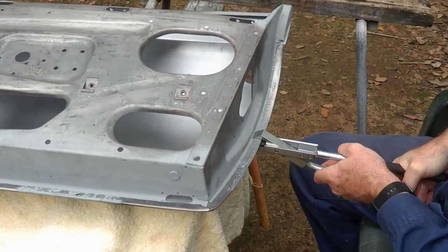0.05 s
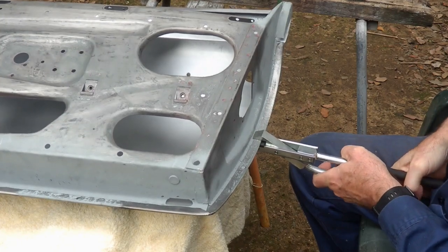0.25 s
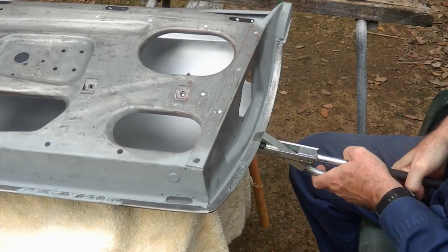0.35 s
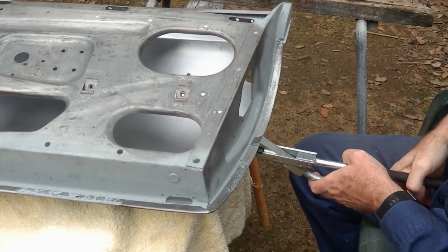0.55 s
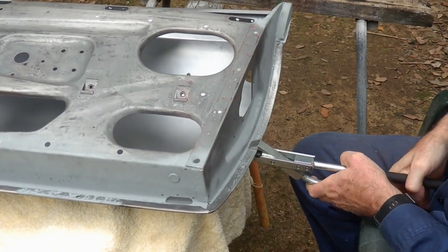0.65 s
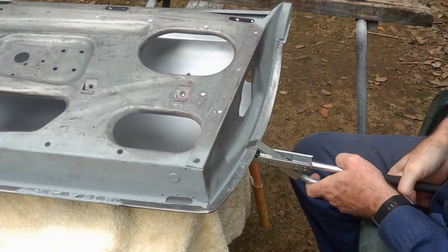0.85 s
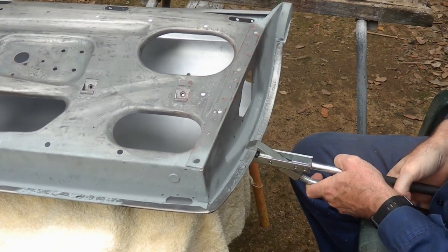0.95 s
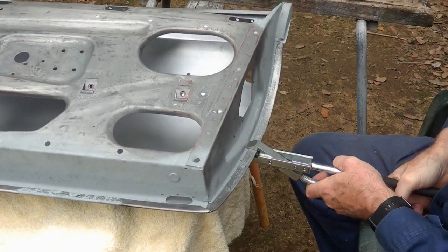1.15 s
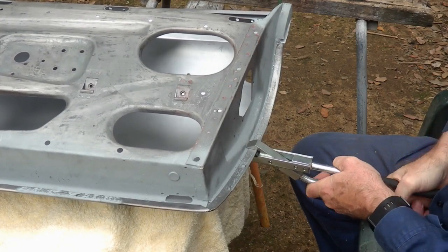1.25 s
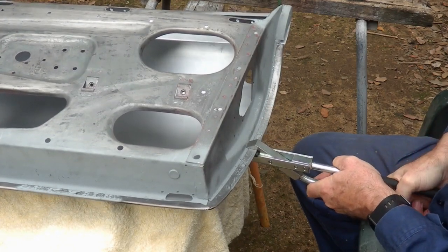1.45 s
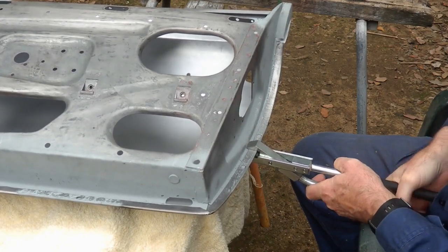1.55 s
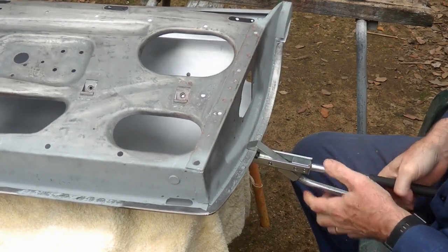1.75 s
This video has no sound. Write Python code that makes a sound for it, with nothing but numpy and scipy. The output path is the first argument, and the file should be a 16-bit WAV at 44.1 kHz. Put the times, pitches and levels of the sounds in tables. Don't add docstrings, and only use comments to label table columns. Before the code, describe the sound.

After a brief quiet, thin metal groans, pops and crackles under a hand tool, strongest around the middle, then rings away to a few small clicks; low rumble and a faint bird, recorded a metre or two away.

```python
import sys
import numpy as np
from scipy import signal
from scipy.fft import rfft, irfft
from scipy.io import wavfile
from scipy.ndimage import uniform_filter1d

SR = 44100
rng = np.random.default_rng(int(sys.argv[2]) if len(sys.argv) > 2 else 0)


def transcribe(signal):
    frames = np.atleast_2d(signal).T
    limited = np.clip(frames, -1, 1)
    pcm = np.round(limited * 32767).astype(np.int16)
    wavfile.write(sys.argv[1], SR, pcm)


def gain_from_db(level_db):
    decades = np.asarray(level_db, float) / 20
    return 10 ** decades


N = 79380


def curve(hz, table):
    table = np.array(table, float)
    return np.interp(np.log(np.maximum(hz, 1)), np.log(table[:, 0]), table[:, 1])


def noise(table, db, side_db):
    hz = np.arange(N // 2 + 1) * SR / N
    inside = (hz > table[0][0]) * (hz < table[-1][0])
    gain = gain_from_db(curve(hz, table)) * inside
    mid, side = irfft(rfft(rng.standard_normal((2, N))) * gain, N)
    return gain_from_db(db) / np.std(mid) * (mid + gain_from_db(side_db) * side * np.array([[1], [-1]]))


# pitch in Hz, level in dB per Hz.
RUMBLE_TONE = [(20, -13), (38, -2.5), (58, 0), (115, -0.5), (200, -3.5), (450, -14), (900, -22.5),
               (2500, -48.5)]


def rumble():
    return noise(RUMBLE_TONE, -48.5, side_db=-11.5) * gain_from_db(np.array([[.7], [-.7]]))


# pitch in Hz, level in dB per Hz.
HISS_TONE = [(1500, -7.5), (2500, -13), (3700, -23), (5000, -16.5), (6500, -4.5), (10000, -2.5), (14500, 2),
             (15750, -4)]


def hiss():
    return noise(HISS_TONE, -60, side_db=-2.54)


def whistle():
    whistle_hz, whistle_db = 15734, -64
    t = np.arange(N) / SR
    return gain_from_db(whistle_db) * np.sqrt(2) * np.sin(2 * np.pi * whistle_hz * t)


# start in seconds, length in seconds, start pitch in Hz, end pitch in Hz,
# level in dB.
BIRD_CALLS = [
    (1.375, 0.14, 4480, 4440, -79),
    (1.51, .1, 4030, 4060, -81.5),
    (1.647, 0.093, 4250, 4440, -71),
]


def bird():
    t, out = np.arange(N) / SR, np.zeros(N)
    for start, length, start_hz, end_hz, db in BIRD_CALLS:
        progress = np.clip((t - start) / length, 0, 1)
        waver_hz = 300 * uniform_filter1d(rng.standard_normal(N), size=400)
        hz = start_hz + (end_hz - start_hz) * np.sqrt(progress) + waver_hz
        flutter_db = 100 * uniform_filter1d(rng.standard_normal(N), size=500)
        swell = np.sqrt(2 * np.sin(np.pi * progress) + 1e-12)
        out += gain_from_db(db - 1.5 + flutter_db) * swell * np.sin(2 * np.pi * np.cumsum(hz) / SR)
    return out


def shed_echo(x):
    t60_s, echo_db = 0.24, -11
    t = np.arange(SR // 3) / SR
    mid, side = rng.standard_normal((2, len(t))) * np.exp(-np.log(1000) * t / t60_s)
    side = signal.sosfilt(signal.butter(2, 1500, "high", fs=SR, output="sos"), side)
    tail = np.array([mid + side, mid - side])
    tail = tail / np.sqrt(np.sum(tail ** 2) / 2)
    return gain_from_db(echo_db) * signal.fftconvolve(x, tail, axes=1)[:, :N]


def ring(hz, db, t60, times, sizes, drive, pan_db, swell_s):
    t = np.arange(SR // 2) / SR
    phase = np.outer(hz, t) + rng.random((len(hz), 1))
    tones = np.sin(2 * np.pi * phase) * gain_from_db(db[:, None] - 60 * t / t60[:, None])
    tones = tones * (1 - np.exp(-t / max(swell_s, 1e-5)))
    wide = rng.standard_normal(len(hz)) * np.minimum((hz / 3370) ** 1.5, 1.5)
    starts = (times * SR).astype(int)
    out = np.zeros((2, N + len(t)))
    for c, port in enumerate((1 + wide / 2, 1 - wide / 2)):
        for at, sound in zip(starts, (sizes * port) @ tones):
            at = min(at, N)
            out[c, at:at + len(t)] += sound
        out[c, :N] += signal.fftconvolve(drive, port @ tones)[:N]
    return out[:, :N] * gain_from_db(np.array([[pan_db], [-pan_db]]) / 2)


# time in seconds, level of creep and scraping in dB.
SQUEEZE = [(0, -58.5), (.03, -69.5), (.2, -61), (.25, -47), (.33, -56), (.4, -51), (.62, -51), (0.701, -35),
           (.8, -49.5), (.9, -56), (1.001, -54), (1.2, -77), (1.578, -75), (1.651, -60), (1.74, -56),
           (1.8, -54.5)]


def effort():
    times, db = np.array(SQUEEZE).T
    return gain_from_db(np.interp(np.arange(N) / SR, times, db))


# start in seconds, peak level in dB, favoured pitch in Hz,
# chatter length in steps of 5.3 ms.
TOOL_TICKS = [(.225, -47.5, 7500, 4.1), (0.4024, -48.5, 7000, 1.36), (0.4427, -45.5, 7040, 1.56),
              (.4868, -33.5, 7600, 0.15), (.558, -46.5, 7060, 3.4), (0.63, -39.5, 7300, 1.3),
              (0.642, -38, 7540, 1.3), (0.664, -39, 4800, 1.43), (0.7101, -35, 7300, 2.1),
              (0.8312, -30, 6500, .9), (0.8322, -28, 4720, 2.2), (.855, -26.5, 6760, 2),
              (0.9024, -30, 8900, 0.72), (0.916, -42, 9500, 2.2), (.868, -31, 3100, 3.6),
              (1.184, -54, 6200, .1), (1.3123, -31, 7000, .9), (1.315, -32.5, 7600, 1.47),
              (1.5645, -43, 9900, .1), (1.746, -49, 5830, 0.67), (1.792, -42, 7600, .3)]
# pitch in Hz, level in dB.
STEEL_TONE = [(1800, -22), (3000, -16), (4500, -3.5), (7300, -0.5), (9300, 4.5), (11000, 2), (16000, 3)]


def tool():
    snap_t60_s, steel_t60_s, chatter_s = 0.0064, 0.073, 0.0053
    tick_db, snap_db, grit_db = -23, 4, -67
    hz = np.geomspace(1800, 16000, num=360) * np.exp(.004 * rng.standard_normal(size=360))
    quick = np.arange(len(hz)) % 4 == 0
    t60 = np.where(quick, snap_t60_s, steel_t60_s * (7000 / hz) ** 1.17)
    db = tick_db + np.where(quick, snap_db + 7 * np.log2(hz / 9000), curve(hz, STEEL_TONE))

    knocks = np.repeat(np.array(TOOL_TICKS), repeats=4, axis=0)
    start, peak_db, centre_hz, chatter = np.split(knocks, 4, axis=1)
    first = np.arange(len(knocks))[:, None] % 4 == 0
    late = 2 * rng.random((len(knocks), 1)) * ~first * chatter_s * np.abs(chatter)

    octaves = np.log2(hz / centre_hz) / 0.26 * (centre_hz / 7000) ** 1.38
    focus = np.exp(-.5 * octaves ** 2) + 0.13
    snap = first * 0.38 + .1
    rattle = focus * np.clip(chatter, .1, 1) * (first * .5 + .6)
    luck = rng.standard_normal((len(knocks), len(hz)))
    sizes = gain_from_db(peak_db) * np.where(quick, snap, rattle) * luck

    grains = rng.standard_normal(N) * (rng.random(N) < .05)
    grit = grains * effort() * gain_from_db(grit_db + 45)
    return ring(hz, db, t60, (start + late)[:, 0], sizes, grit, pan_db=2.5, swell_s=0)


# start in seconds, peak level in dB, favoured pitch in Hz, hardness in dB.
FLANGE_SLIPS = [(0.2151, -26, 276, -2.5), (.233, -35, 225, 5.5), (.376, -35.5, 590, -14),
                (.405, -29.5, 385, -5), (.468, -25, 510, -7.5), (.49, -30, 505, -16),
                (.558, -23.5, 570, -8), (.58, -36, 400, 1.5), (.638, -19.5, 680, 2), (.650, -27, 700, -21),
                (0.6657, -15.5, 756, -1), (.68, -34, 614, 12), (.710, -22.5, 463, -7), (.722, -25, 428, -1),
                (.742, -48.5, 400, 16), (.834, -24.5, 745, 3), (.854, -26, 595, 19),
                (.859, -20.5, 506, 6.5), (.883, -23, 400, 7), (.897, -27, 302, 10), (.92, -33.5, 496, 8.5),
                (1.77, -38, 463, -5), (1.788, -36.5, 463, -9)]
# pitch in Hz, level in dB, time to fade by 60 dB in seconds.
PANEL_TONES = [(207.1, 0.5, 0.32), (242, -1.5, 0.12), (282.9, -1, 0.39), (325.8, -1, 0.39),
               (416, -4.5, 0.76), (447.9, 1, .15), (477.5, -1.5, 0.19), (550.1, -4, 0.47),
               (571.2, -6.5, 0.23), (697, 0, 0.12), (764.4, 0.5, 0.13), (886.5, 0.5, 0.13),
               (1052, -11.5, 0.14), (843.5, -3, 0.12)]
# pitch in Hz, level in dB.
SKIN_TONE = [(85, -17), (160, -12), (300, 1.5), (900, -6), (1050, -9.5), (1500, -14), (2700, -19.5),
             (4500, -29)]


def panel():
    panel_db, skin_db, skin_t60_s = -16, -18.5, 0.15
    creep_per_s, creep_db = 500, -38.5
    release_s, gripped_db = .7, -8
    minor = np.geomspace(85, 4500, num=170) * np.exp(.01 * rng.standard_normal(size=170))
    main_hz, main_db, main_t60 = np.array(PANEL_TONES).T
    hz = np.r_[main_hz, minor]
    db = np.r_[panel_db + main_db, skin_db + curve(minor, SKIN_TONE)]
    t60 = np.r_[main_t60, skin_t60_s * (500 / minor) ** .2]

    slips = np.array(FLANGE_SLIPS)
    start, peak_db, centre_hz, hardness_db = np.split(slips, 4, axis=1)
    low = np.exp(-.5 * (np.log2(hz / centre_hz) / 1.19) ** 2)
    low = low / (1 + (hz / 1000) ** 8)
    high = gain_from_db(hardness_db) / (1 + (1100 / hz) ** 4)
    long_ringing = t60 > .4
    spread = np.where(long_ringing, .2, .6)
    luck = 0.81 + spread * rng.standard_normal((len(slips), len(hz)))
    sizes = gain_from_db(peak_db) * (low + high) * luck
    sizes = sizes * np.where(long_ringing & (start < release_s), gain_from_db(gripped_db), 1)

    chance, strength = rng.random((2, N))
    crackle = (chance < creep_per_s / SR) * gain_from_db(-2.5 * np.log(strength + 1e-9))
    creep = crackle * effort() * gain_from_db(creep_db + 36)
    sound = ring(hz, db, t60, start[:, 0], sizes, creep, pan_db=1.16, swell_s=0.0013)
    return signal.sosfilt(signal.butter(2, 70, "high", fs=SR, output="sos"), sound)


def scene():
    work = panel() + tool()
    out = work + shed_echo(work) + rumble() + hiss() + whistle() + bird()
    return np.array([out[0], np.roll(out[1], shift=2)])


def low_pass(x):
    return signal.sosfilt(signal.butter(12, 16510, fs=SR, output="sos"), x)


def record(dry):
    side_top_hz, side_left_db, top_hz = 10100, -12.5, 15800
    mid, side = (dry[0] + dry[1]) / 2, (dry[0] - dry[1]) / 2
    low = signal.sosfiltfilt(signal.butter(6, side_top_hz, fs=SR, output="sos"), side)
    side = low + gain_from_db(side_left_db) * (side - low)
    treble_cut = signal.ellip(8, .2, 22, top_hz, fs=SR, output="sos")
    mix = signal.sosfilt(treble_cut, np.array([mid + side, mid - side]))
    return low_pass(mix)


dry = scene()
out = record(dry)
transcribe(out)
```